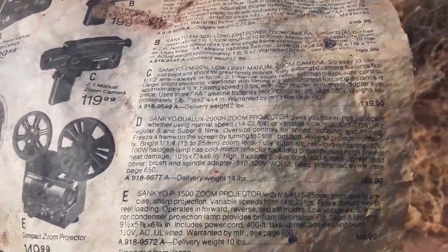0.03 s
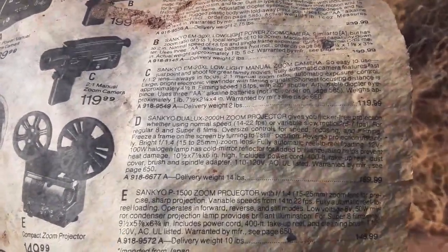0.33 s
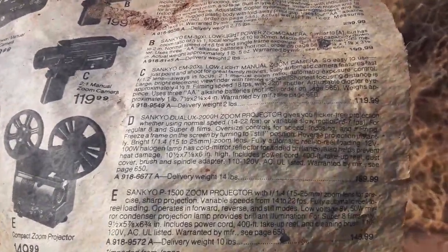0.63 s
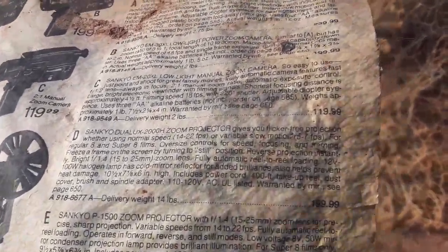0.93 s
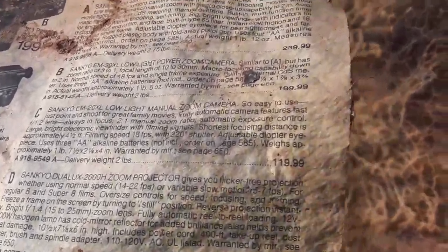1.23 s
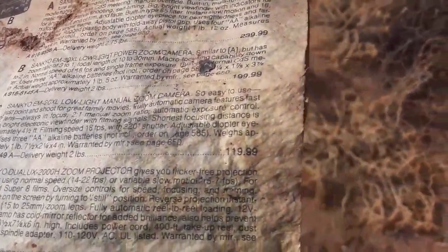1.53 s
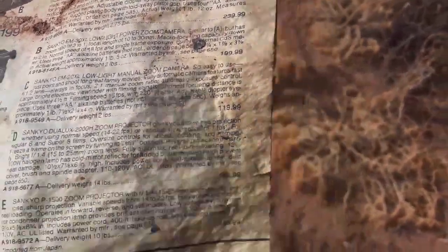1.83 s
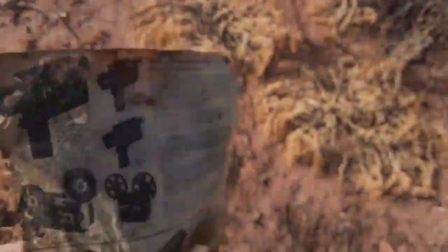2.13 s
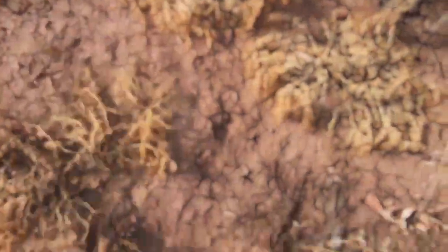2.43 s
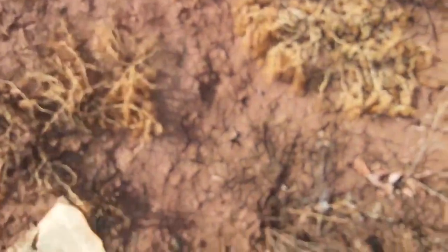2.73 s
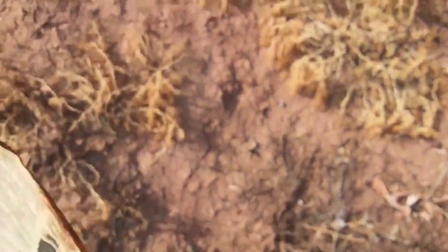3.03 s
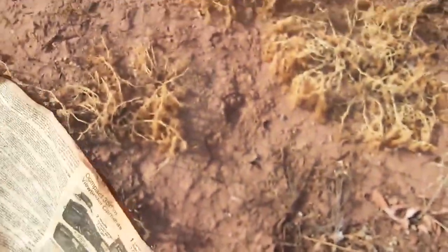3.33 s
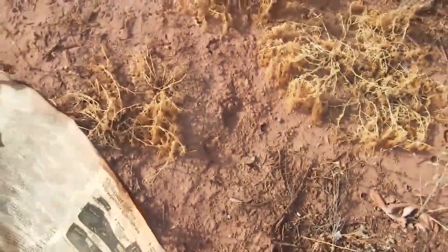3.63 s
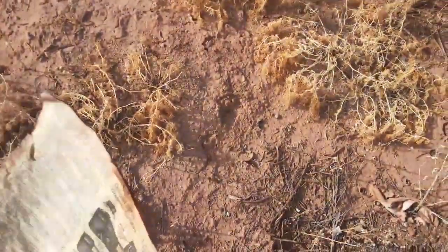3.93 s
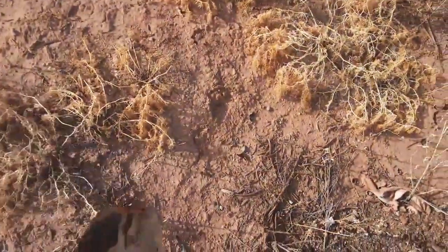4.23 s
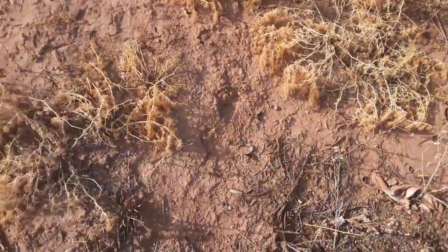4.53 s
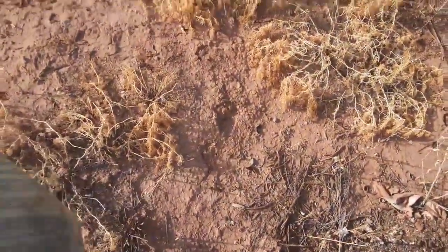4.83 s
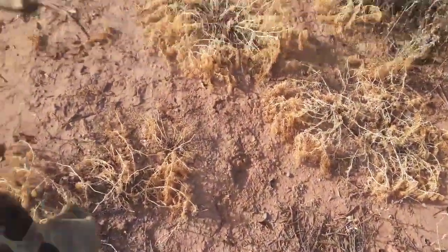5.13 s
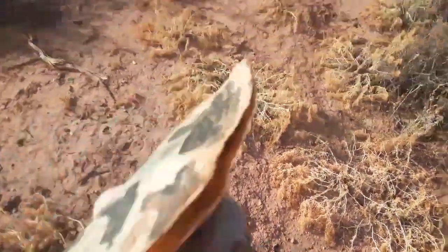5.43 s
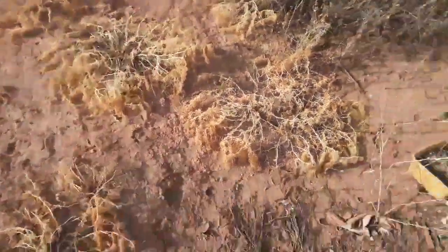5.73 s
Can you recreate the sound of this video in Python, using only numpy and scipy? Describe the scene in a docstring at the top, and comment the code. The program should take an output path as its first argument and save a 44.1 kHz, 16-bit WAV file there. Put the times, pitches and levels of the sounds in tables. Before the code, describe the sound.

Close fingers rub a dry page before it rustles and snaps in bursts, while light gusts rumble on the microphone.

```python
"""Fingers brush a brittle old catalogue page, close to two microphones outdoors, over a light breeze
and a faint low drone like an engine idling far away. Creases buckle with sharp snaps, a dull knock
sounds near the start, and gusts buffet the microphone ports. From about two seconds in, the page is
turned over and shaken out: it flexes, rubs and crackles as its fibres break in tiny fractures.
A low bump of wind or handling comes near 3.4 s."""
import sys
import numpy as np
from scipy import signal
from scipy.fft import rfft, irfft, next_fast_len
from scipy.io import wavfile
from scipy.ndimage import uniform_filter1d

SR = 44100
rng = np.random.default_rng(int(sys.argv[2]) if len(sys.argv) > 2 else 0)


def store_pcm(level_fs):
    """Save levels as 16-bit WAV."""
    pcm = np.round(np.clip(level_fs, -1, 1) * 32767).astype(np.int16)
    wavfile.write(sys.argv[1], SR, np.atleast_2d(pcm).T)


N = 258867
TIME = np.arange(N) / SR
SIZE = next_fast_len(N)
FREQ = np.maximum(np.arange(SIZE // 2 + 1) * SR / SIZE, 1)
CUTOFF_HZ = 15900


def from_db(db):
    """Decibels to gain."""
    return 10 ** (np.asarray(db) / 20)


def pan(left_db):
    """Stereo gains that put the left side this far above the right."""
    return from_db([[left_db / 2], [-left_db / 2]])


def rms_one(x):
    """Scale to an rms of 1."""
    return x / np.sqrt(np.mean(x ** 2) + 1e-20)


def levelled(x, size):
    """Hold the rms at 1 over stretches of that many samples."""
    return x / np.sqrt(np.abs(uniform_filter1d(np.mean(x ** 2, axis=0), size)) + 1e-12)


def automation(points):
    """A breakpoint curve at every sample."""
    return np.interp(TIME, *np.transpose(points))


def colour(points, hz=FREQ):
    """Gain of an EQ curve at the given frequencies."""
    at, db = np.transpose(points)
    return from_db(np.interp(np.log(hz), np.log(at), db))


def bell(hz, centre_hz, db, octaves):
    """Gain of one resonance or dip."""
    return from_db(db * np.exp(-(np.log2(hz / centre_hz) / octaves) ** 2))


def band(x, low_hz, high_hz):
    """One steep-edged band of a sound."""
    gain = 1 / np.sqrt((1 + (low_hz / FREQ) ** 12) * (1 + (FREQ / high_hz) ** 12))
    return irfft(rfft(x, SIZE) * gain, SIZE)[:, :N]


def drift(rate_hz):
    """Slow random modulation with an rms of 1."""
    hop, settle = 40, 2000
    r = np.exp(-2 * np.pi * rate_hz * hop / SR)
    slow = signal.lfilter([1], [1, -2 * r, r * r], rng.standard_normal(N // hop + settle + 2))[settle:]
    return np.interp(np.arange(N) / hop, np.arange(len(slow)), rms_one(slow))


def swell(start_s, length_s, attack_db_per_s, release_db_per_s, ramp_db=0):
    """Envelope of one movement: it rises, ramps by ramp_db over its length, and dies away."""
    t = TIME - start_s
    progress = np.clip(t / max(length_s, 1e-3), 0, 1)
    fade_db = attack_db_per_s * np.maximum(-t, 0) + release_db_per_s * np.maximum(t - length_s, 0)
    return from_db(ramp_db * progress - fade_db)


def port_noise(gain, alike, lead_s=0):
    """Coloured noise at the two ports: a shared part, lead_s later on the right, plus each one's own."""
    shared, *own = rfft(rng.standard_normal((3, SIZE)))
    arrival = np.exp(-2j * np.pi * FREQ * np.array([[0], [lead_s]]))
    pair = np.sqrt(alike) * shared * arrival + np.sqrt(1 - alike) * np.array(own)
    return rms_one(irfft(gain * pair, SIZE)[:, :N])


# Light finger strokes: (start [s], length [s], crackle level [dB], rub send [dB])
FINGER_SLIDES = [(0.0, 0.019, -55.5, -5), (0.258, 0.18, -61.5, -10), (0.741, 0.025, -60, -15),
                 (0.802, 0.11, -65.5, -9), (1.007, 0.086, -57, -10), (1.178, 0.1, -59.5, -6.5),
                 (1.336, 0.026, -57, -21), (1.39, .09, -61.5, -19), (1.575, 0.031, -62, -23),
                 (1.787, 0.11, -59.5, -22), (3.135, 0.074, -57.5, -5.5), (3.296, 0.35, -67.5, 0.5),
                 (3.467, 0.036, -62.5, 1), (3.8, .08, -65.5, -6.5), (3.906, 0.27, -57.5, -14)]

def finger_slides():
    """Power envelopes of rub and crackle as fingers slide over the page without flexing it."""
    rub = crackle = 0
    for start_s, length_s, level_db, rub_db in FINGER_SLIDES:
        gain = from_db(level_db) * swell(start_s, length_s, attack_db_per_s=264, release_db_per_s=153)
        rub += (from_db(rub_db) * gain) ** 2
        crackle += gain ** 2
    return rub, crackle


# Tone of the paper: (frequency [Hz], gain [dB])
PAPER_EQ = [(200, -2), (340, 9), (520, -7.5), (900, -7), (1300, -6.5), (1800, -10.5), (2300, -7),
            (3000, -16.5), (4500, -17.5), (6500, -13.5), (8400, -13), (10100, -20.5), (12500, -15.5),
            (15500, -16.5)]
# Poses of the sheet, each cupping the air in its own way: (start [s], left port's lead [s],
# left over right [dB], hollow [Hz], hollow gain [dB], ring [Hz], ring gain [dB], treble shelf [dB])
SHEET_POSES = [ (0, 0.00019, 9, 1560, 4, 3870, 4, 2.5), (1.8, 0.00029, 4, 1770, 8.5, 3800, 6, -7.5),
               (2.138, 0.00022, 1, 1440, 0, 4070, 2, -11), (2.74, .00021, 3, 1030, 2.5, 4730, 5, -6.5),
               (3.22, 0.00028, 8, 1640, 10, 4860, 3.5, -2.5), (4.0, 0.00021, 2, 1420, 1, 4700, 3.5, -9.5),
               (4.72, 0.00035, 2.5, 1930, 10, 3660, 14, -5), (4.98, 0.00034, 2, 1750, 8.5, 4000, 5.5, -7),
               (5.358, 0.0002, 0.5, 1530, 4, 5250, -3.5, -12)]

def sheet_friction():
    """Friction noise, coloured and panned by each pose in turn, with its echo from the ground."""
    out = np.zeros((2, N))
    ends = [pose[0] for pose in SHEET_POSES[1:]] + [np.inf]
    shelf = 1 / (1 + (7000 / FREQ) ** 4)
    echo = from_db(-14) * np.exp(-2j * np.pi * FREQ * 0.009) / (1 + 1j * FREQ / 12000)  # 9 ms late
    dip = bell(FREQ, 2360, db=-4.5, octaves=0.18)  # the sheet radiates weakly between hollow and ring
    paper = colour(PAPER_EQ) * dip * (1 + echo)
    for pose, end in zip(SHEET_POSES, ends):
        start, lead_s, left_db, hollow_hz, hollow_db, ring_hz, ring_db, treble_db = pose
        hollow = bell(FREQ, hollow_hz, hollow_db, octaves=0.26)
        ring = bell(FREQ, ring_hz, ring_db, octaves=0.22)
        tone = paper * hollow * ring * from_db(treble_db * shelf)
        noise = port_noise(tone, alike=0.78 / (1 + FREQ / 9000), lead_s=lead_s)
        crossfade = uniform_filter1d(1. * ((TIME >= start) & (TIME < end)), size=1500)
        out += np.sqrt(np.abs(crossfade)) * noise * pan(left_db)
    return out


def fractures(per_s, spread_db):
    """Energies of tiny fibre breaks: they come in clumps, many small and a few large."""
    born = rng.random(N) < per_s * from_db(4 * drift(18)) / SR
    return born * from_db(spread_db * np.minimum(rng.exponential(1, N), 3.5)) ** 2


def grain(breaks, decay_s, smooth):
    """Gritty envelope of mean power near 1: each break swells and dies over a bed of smooth friction."""
    r = np.exp(-1 / (decay_s * SR))
    strengths = breaks * from_db(6.4 * rng.standard_normal(N))
    power = signal.lfilter([1], [1, -2 * r, r * r], strengths + 1e-18)
    power /= uniform_filter1d(power, size=3000) + 1e-9
    return np.sqrt(smooth + (1 - smooth) * np.abs(power))


# Blend from crumpling to smooth sliding: (time [s], share of smooth friction [0-1])
SMOOTHNESS = [(0, 0.12), (1.97, 0.59), (2.12, 0.41), (4.35, 0.43), (5.2, 0.23)]

def rustle():
    """The same breaks shake the lows, mid rub and high crackle; the wide, slow bends ring longest."""
    low_gain, rub_gain, crackle_gain = handling()
    smooth = automation(SMOOTHNESS)
    breaks = fractures(per_s=540, spread_db=2.5)
    sheet = sheet_friction()
    lows = levelled(band(sheet, 222, 587), size=2500)
    mids = levelled(band(sheet, 598, 2034), size=2000)
    highs = levelled(band(sheet, 2520, SR / 2), size=2000)
    fine = band(highs, 5200, SR / 2)  # the finest fibres break with strengths of their own
    body = lows * grain(breaks, decay_s=0.0018, smooth=smooth / 2)
    rub = mids * grain(breaks, decay_s=0.00094, smooth=smooth)
    crackle = (highs - fine) * grain(breaks, decay_s=0.0016, smooth=smooth)
    crackle += fine * grain(breaks, decay_s=0.00093, smooth=smooth)
    return low_gain * body + rub_gain * rub + crackle_gain * crackle


def handling():
    """Faders for lows, rub and crackle: slides, bends and the bump add in power."""
    slide_rub, slide_crackle = finger_slides()
    low_power, friction = bends_and_bump()
    low = from_db(-0.5) * np.sqrt(low_power)
    rub = from_db(-1.5) * np.sqrt(slide_rub + friction)
    crackle = np.sqrt(slide_crackle + friction)
    return low, rub, crackle


# Partials of the hum, ahead of its fader: (frequency [Hz], level [dB])
HUM_PARTIALS = [(70.8, -58.5), (141.6, -67), (212, -68)]
# Fader ride that swells and fades the hum: (time [s], gain [dB])
HUM_FADER = [(0, -1.5), (1.55, 5.5), (3.1, 9.5), (3.4, -41), (5.87, -4)]
# Tone of the rumble around the hum: (frequency [Hz], gain [dB])
RUMBLE_EQ = [(20, -15), (65, -3), (130, -0.5), (185, -8), (250, -4), (325, 2), (390, -8), (480, -17.5),
             (620, -32), (1200, -74)]

def far_drone(rumble_db, waver):
    """A slightly wavering hum in a steady rumble, like an engine idling far away."""
    wavering_time = np.cumsum(1 + waver * drift(1.85)) / SR
    hum = 0
    for hz, db in HUM_PARTIALS:
        peak = np.sqrt(2) * from_db(db + 2.2 * drift(0.93))
        hum += peak * np.sin(2 * np.pi * (hz * wavering_time + rng.random()))
    rumble = from_db(rumble_db) * port_noise(colour(RUMBLE_EQ), alike=0.78)
    return from_db(automation(HUM_FADER)) * hum + rumble


# Tone of the air bed: (frequency [Hz], gain [dB])
AIR_EQ = [(300, 10), (1000, 4), (2500, 5.5), (7000, 0.5), (10000, -2), (12500, 5.5), (15500, 5)]

def air_hiss(level_db):
    """The faint, wide hiss of still air."""
    return from_db(level_db) * port_noise(colour(AIR_EQ), alike=0)


# Tone of eddies on the ports: (frequency [Hz], gain [dB])
WIND_EQ = [(20, -21), (45, -7), (75, 3.5), (110, 5), (160, -6.5), (240, -10.5), (400, -29), (800, -40),
           (2000, -74)]
# The continuous breeze: (time [s], level [dB])
BREEZE_LEVEL = [(0, -57), (1.0, -48.5), (1.6, -63.5), (2.35, -50.5), (2.7, -57.5), (3.35, -58),
                (3.7, -47.5), (4.2, -43.5), (4.9, -46.5), (5.25, -41.5), (5.87, -57)]
# Gusts on top of it: (start [s], length [s], level [dB])
GUST_CUES = [(0.025, 0.061, -44.5), (0.207, 0.12, -36.5), (0.43, 0.021, -43), (0.71, 0.14, -44.5),
             (3.045, 0.14, -41.5), (3.232, 0.031, -40), (3.416, 0.17, -37.5), (4.339, 0.13, -34.5),
             (4.488, 0.1, -40), (4.638, 0.036, -37.5), (5.13, .025, -38), (5.432, 0.024, -40.5),
             (5.566, 0.14, -40.5)]

def wind(flutter_db):
    """Gusts ride on a breeze; their eddies strike the two ports almost independently."""
    eddies = levelled(port_noise(colour(WIND_EQ), alike=0.14), size=2200)
    power = from_db(automation(BREEZE_LEVEL)) ** 2
    for start_s, length_s, level_db in GUST_CUES:
        gust = from_db(level_db) * swell(start_s, length_s, attack_db_per_s=594, release_db_per_s=294)
        power += gust ** 2
    return np.sqrt(power) * from_db(flutter_db * drift(14.3)) * eddies


def burst(gain, swell_s, tail_db, tail_s, alike, lead_s=0.000253):
    """A quick burst of noise with a weak tail, reaching the left port first."""
    t = np.arange(2 * (len(gain) - 1)) / SR
    shared, *own = irfft(gain * rfft(rng.standard_normal((3, len(t)))))
    noise = np.sqrt(alike) * shared + np.sqrt(1 - alike) * np.array(own)
    run = (t / swell_s) ** 2 * np.exp(2 - 2 * t / swell_s)
    tail = from_db(tail_db) * (1 - np.exp(-t / swell_s)) * np.exp(-t / tail_s)
    left, right = (run + tail) * noise
    pair = np.array([left, np.interp(t - lead_s, t, right)])
    return rms_one(pair) * np.sqrt(0.002 / t[-1])  # the energy of rms 1 held for 2 ms


# Tones of a hit's bright crack and of its low pop: (frequency [Hz], gain [dB])
CRACK_EQ = [(700, -21), (1500, 4.5), (2400, -1.5), (4000, 5.5), (6000, 9), (8300, 0.5), (10200, -3),
            (13000, -8), (15800, -3)]
POP_EQ = [(120, -21), (220, 1.5), (360, -2), (600, -8.5), (1400, -7), (2100, -9.5), (4000, -29)]
# Crease snaps, plus a dull low knock at 0.269 s, ahead of the trims:
# (time [s], crack level [dB], crack pitch [Hz], pop level [dB])
SNAPS_AND_KNOCK = [(0.021, -67, 2000, -30), (0.269, -61, 1400, -43), (0.3896, -47.5, 4840, -43),
                   (0.8053, -50.5, 5700, -73), (1.0322, -47.5, 4470, -61), (1.171, -46, 7800, -64),
                   (1.202, -37.5, 3930, -32.5), (1.2845, -43.5, 13600, -63), (1.489, -51.5, 8400, -68),
                   (2.062, -29, 4540, -43), (2.0863, -27, 4020, -21), (2.1552, -19, 4000, -16),
                   (2.1681, -31, 3400, -22), (2.206, -24, 4600, -19.5), (2.214, -22.5, 5300, -16),
                   (2.2687, -33.5, 7500, -32), (2.364, -26, 4670, -50), (2.375, -29.5, 3820, -31),
                   (2.433, -35.5, 4460, -40), (2.781, -41, 4800, -30), (2.814, -24.5, 4840, -21),
                   (2.9403, -27.5, 6400, -38), (2.967, -26.5, 5000, -25), (2.9935, -35, 5000, -58),
                   (3.0996, -35, 3430, -36), (4.0633, -34, 5500, -46), (4.1281, -26, 4700, -59),
                   (4.175, -35, 4530, -42), (4.5341, -36, 5300, -66), (4.5672, -39, 5470, -38),
                   (4.7846, -35.5, 3780, -56), (4.8267, -24.5, 3500, -27), (4.9863, -40, 4500, -35),
                   (5.011, -29, 7100, -22), (5.051, -32, 4930, -27), (5.1294, -16, 3570, -24),
                   (5.1322, -15, 6840, -33), (5.418, -38, 3360, -29), (5.4503, -13.5, 4660, -13.5),
                   (5.4675, -19, 4660, -15), (5.4733, -25, 5000, -19), (5.5457, -32, 2800, -22),
                   (5.6293, -22.5, 5050, -24), (5.6623, -19.5, 6070, -37), (5.755, -37, 5060, -36),
                   (5.853, -30, 6350, -26)]

def snaps_and_knock(crack_trim_db, pop_trim_db):
    """In a snap, a stiff facet by a buckling crease cracks and the sheet pops; the knock is a low thud."""
    size = 4096
    out = np.zeros((2, N + size))
    hz = np.maximum(np.arange(size // 2 + 1) * SR / size, 1)
    for time_s, crack_db, pitch_hz, pop_db in SNAPS_AND_KNOCK + small_creases():
        facet = bell(hz, pitch_hz, db=6, octaves=0.41) * (hz < CUTOFF_HZ)
        facet /= 1 + (0.44 * pitch_hz / hz) ** 4  # a facet radiates little far below its pitch
        crack = burst(colour(CRACK_EQ, hz) * facet, swell_s=.0009, tail_db=-15, tail_s=.0045, alike=.65)
        pop = burst(colour(POP_EQ, hz), swell_s=.0016, tail_db=-5, tail_s=.007, alike=.92)
        hit = from_db(crack_db + crack_trim_db) * crack + from_db(pop_db + pop_trim_db) * pop
        at = int(time_s * SR)
        out[:, at:at + size] += hit
    return out[:, :N]


def small_creases(per_s=13, low_hz=4520, high_hz=12000):
    """Extra hits: small creases tick at random, following the level of the crackle."""
    crackle_db = 20 * np.log10(handling()[2] + 1e-9)
    draws = rng.random((200, 4))
    times = np.cumsum(0.5 + draws[:, 0]) / per_s
    levels_db = np.interp(times, TIME, crackle_db) + 6
    pitches_hz = low_hz * (high_hz / low_hz) ** draws[:, 3]
    pops_db = levels_db - 11
    return [hit for hit in zip(times, levels_db, pitches_hz, pops_db) if hit[0] < TIME[-1]]


# Page bends, plus a low wind or handling bump near 3.4 s:
# (start [s], length [s], opening level [dB], ramp [dB], low send [dB])
BENDS_AND_BUMP = [(1.892, .19, -42, 7, -6), (2.152, 0.064, -35.5, -5, 2), (2.237, 0.016, -43.5, 3.5, 9),
                  (2.304, 0.07, -43, 1.5, 1), (2.438, 0.17, -48, -7, 5.5), (2.58, 0.21, -56.5, 5.5, 6),
                  (2.808, 0.19, -47.5, 0.5, -6.5), (3.048, 0.093, -55, -2.5, 4.5),
                  (3.402, 0.0088, -67.5, -5, 23.5), (3.445, 0.1, -71, -3, 25), (4.057, 0.2, -49.5, 1, -18),
                  (4.274, .14, -48, 4, 1.5), (4.428, 0.19, -48, -11.5, 0), (4.624, 0.25, -51, -7, -2.5),
                  (4.798, 0.14, -43.5, -0.5, -6.5), (5.01, 0.12, -34, 7, -11.5),
                  (5.139, 0.079, -31.5, -10, -10.5), (5.255, .13, -46, 4.5, -4),
                  (5.453, 0.043, -28.5, 0.5, -3), (5.521, 0.14, -31, -0.5, -4.5),
                  (5.685, 0.27, -46, -1, -7), (5.777, 0.019, -39.5, 1, 3)]

def bends_and_bump():
    """Power envelopes of lows and friction: a bend flexes and rubs the sheet; the bump is mostly lows."""
    low = friction = 0
    for start_s, length_s, level_db, ramp_db, low_db in BENDS_AND_BUMP:
        envelope = swell(start_s, length_s, attack_db_per_s=509, release_db_per_s=390, ramp_db=ramp_db)
        gain = from_db(level_db) * envelope
        low += (from_db(low_db) * gain) ** 2
        friction += gain ** 2
    return low, friction


def scene():
    """The paper a little to the left, the wind leaning right, the far background all round."""
    paper = rustle() + snaps_and_knock(crack_trim_db=-1, pop_trim_db=-3) * pan(left_db=2.5)
    buffeting = wind(flutter_db=3) * pan(left_db=-2.4)
    return paper + buffeting + far_drone(rumble_db=-52, waver=0.0051) + air_hiss(level_db=-70.5)


def record(dry):
    """A steep high cut on the whole mix."""
    return signal.sosfilt(signal.ellip(12, .1, 90, CUTOFF_HZ, fs=SR, output="sos"), dry)


dry = scene()
out = record(dry)
store_pcm(out)
```